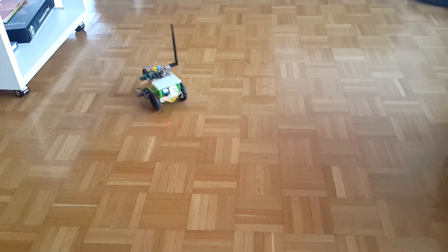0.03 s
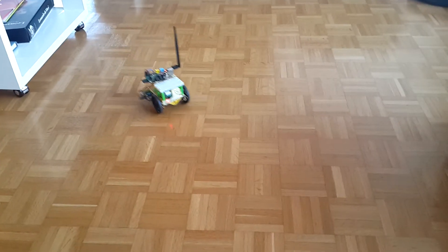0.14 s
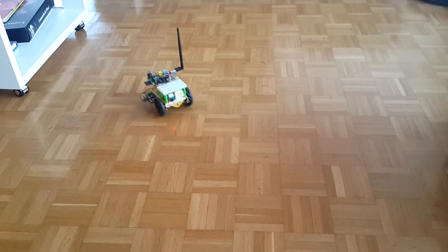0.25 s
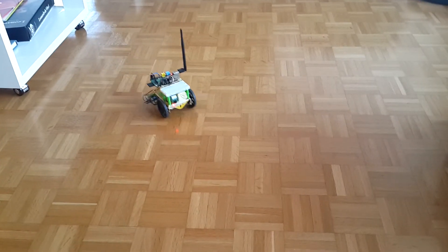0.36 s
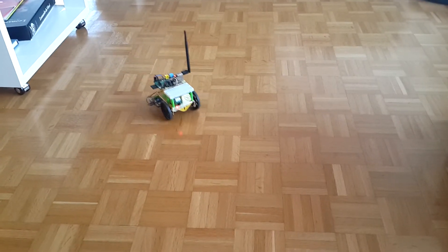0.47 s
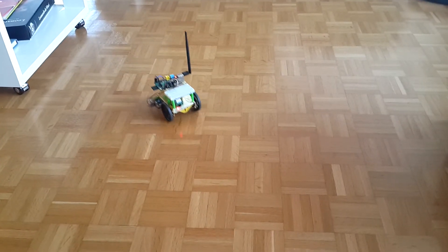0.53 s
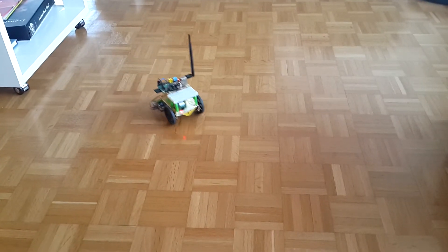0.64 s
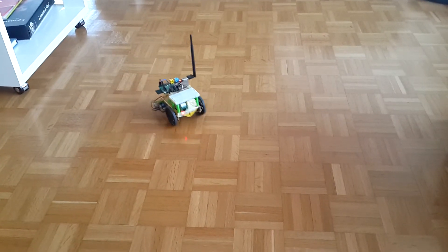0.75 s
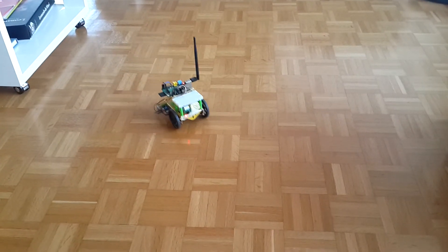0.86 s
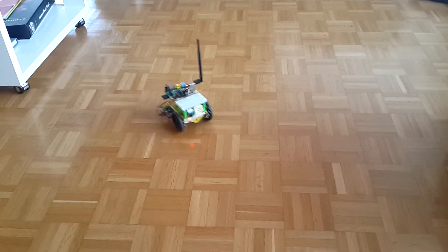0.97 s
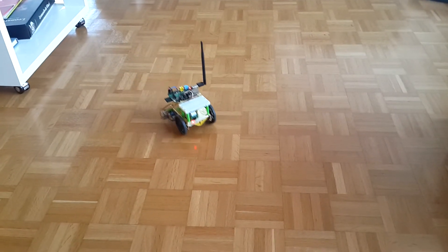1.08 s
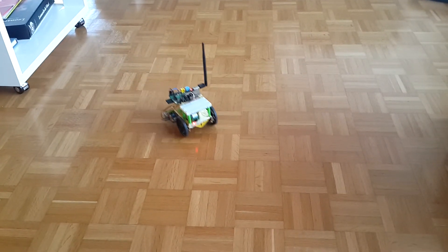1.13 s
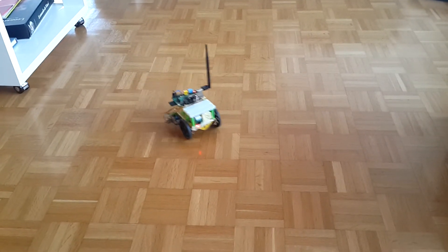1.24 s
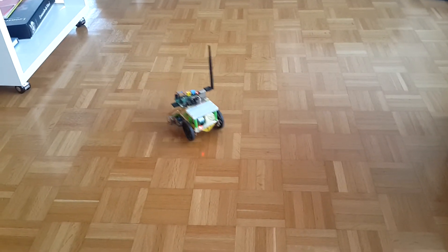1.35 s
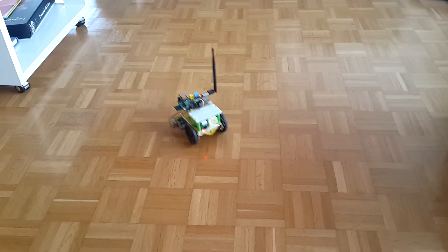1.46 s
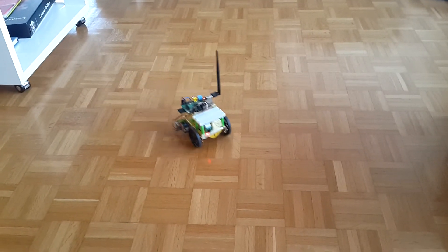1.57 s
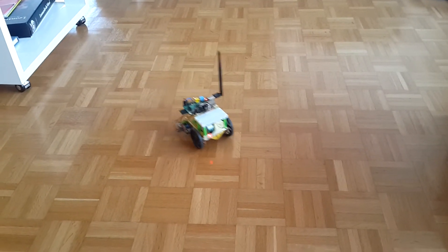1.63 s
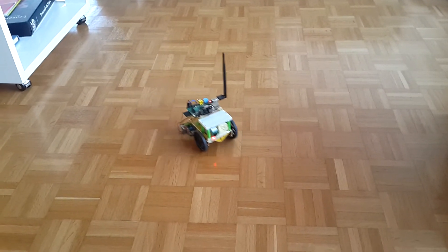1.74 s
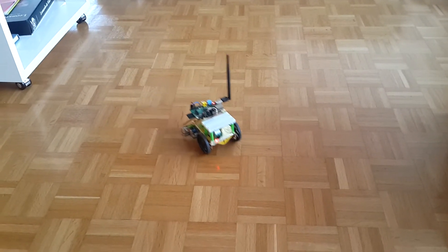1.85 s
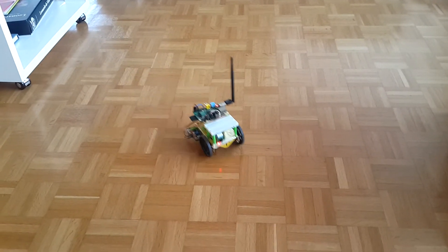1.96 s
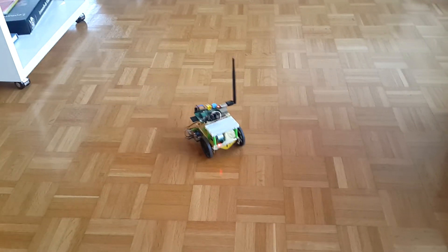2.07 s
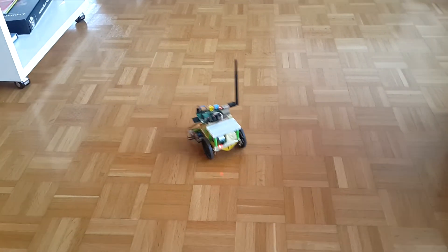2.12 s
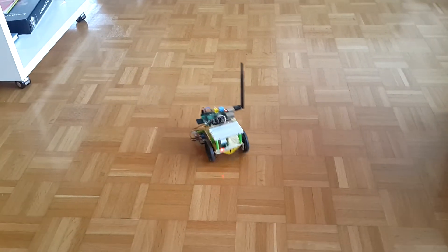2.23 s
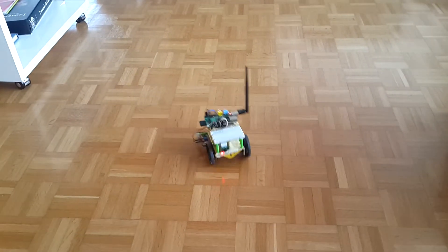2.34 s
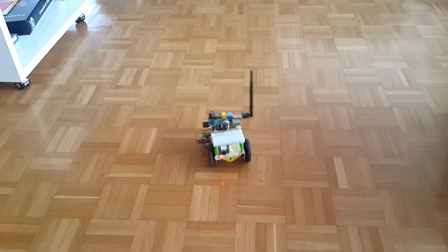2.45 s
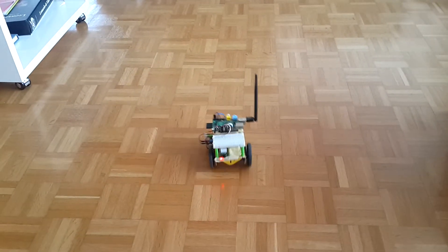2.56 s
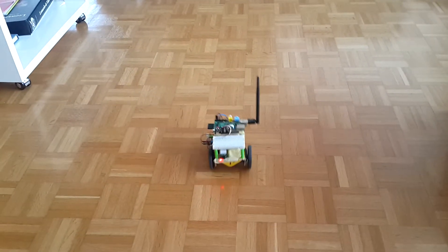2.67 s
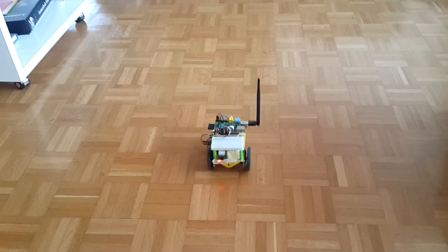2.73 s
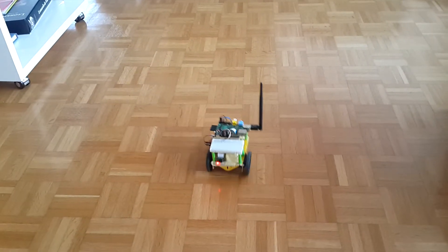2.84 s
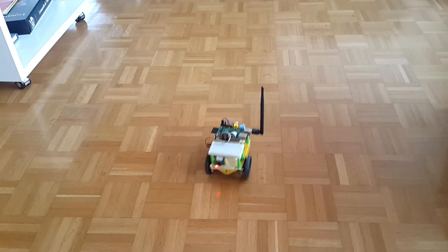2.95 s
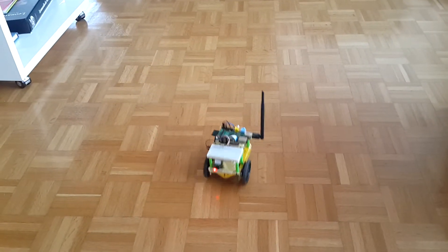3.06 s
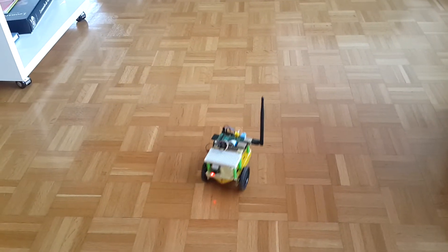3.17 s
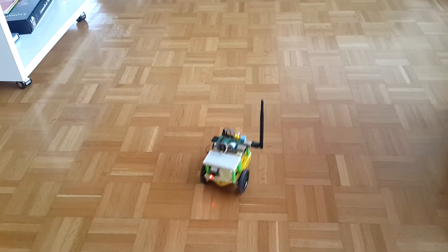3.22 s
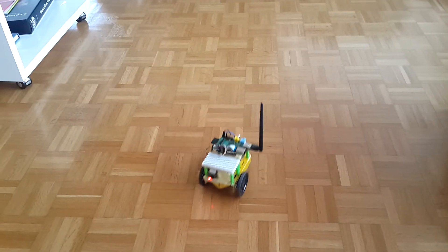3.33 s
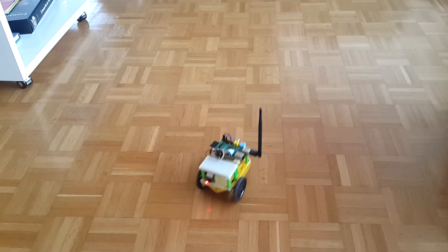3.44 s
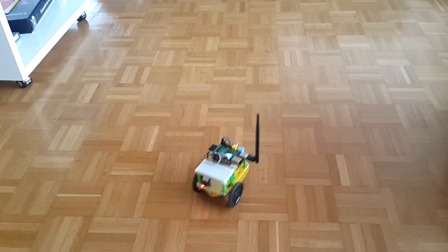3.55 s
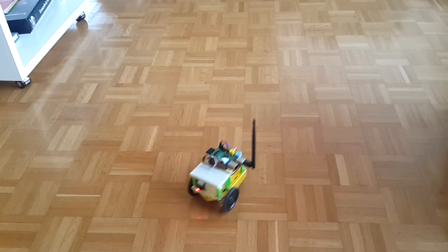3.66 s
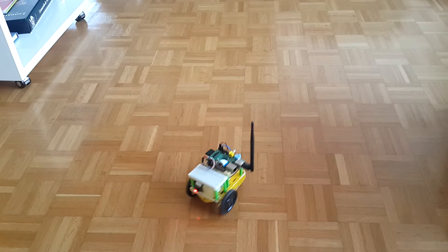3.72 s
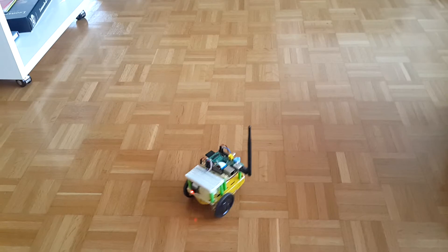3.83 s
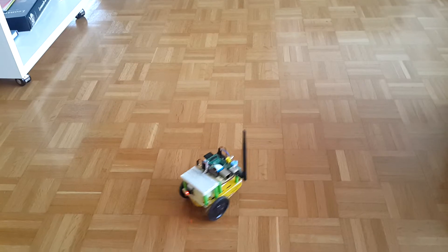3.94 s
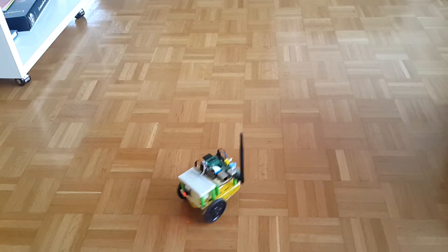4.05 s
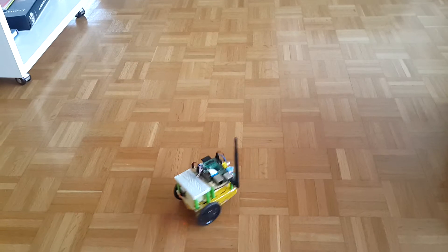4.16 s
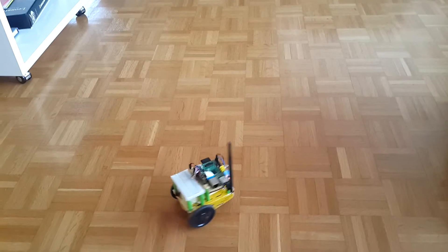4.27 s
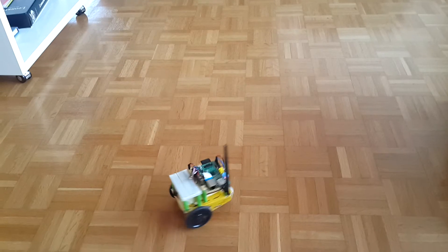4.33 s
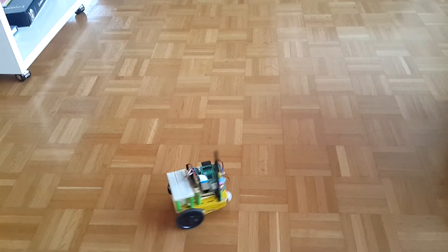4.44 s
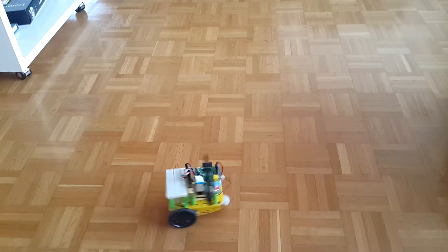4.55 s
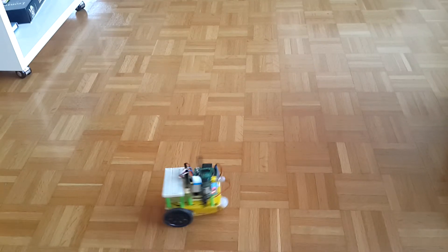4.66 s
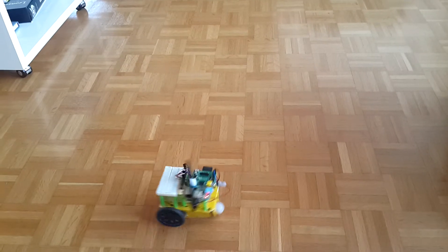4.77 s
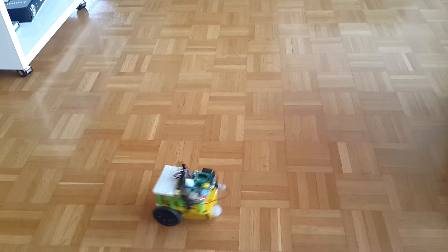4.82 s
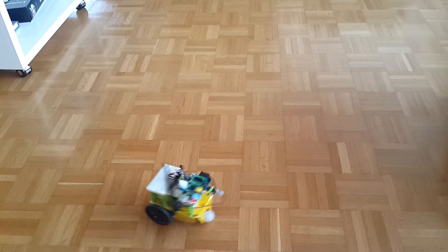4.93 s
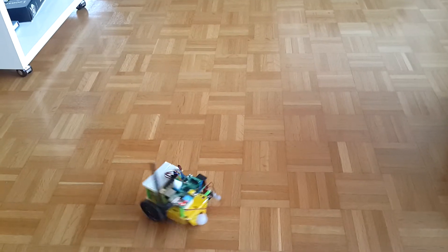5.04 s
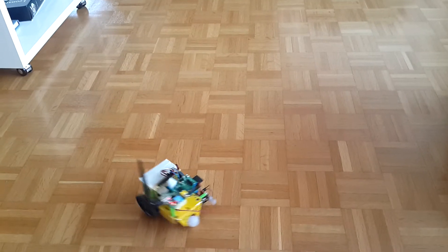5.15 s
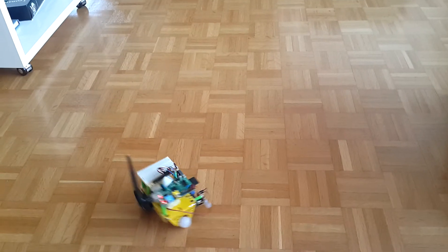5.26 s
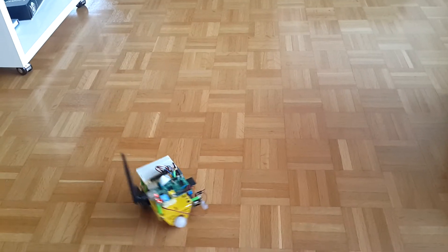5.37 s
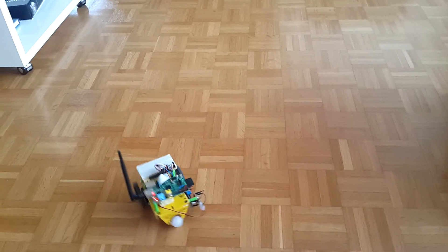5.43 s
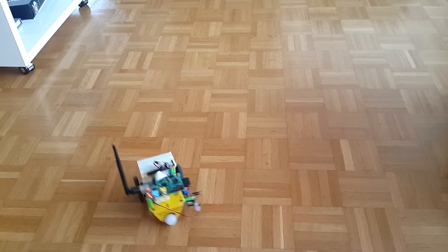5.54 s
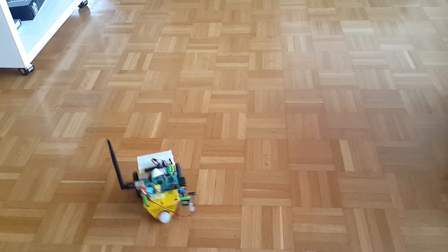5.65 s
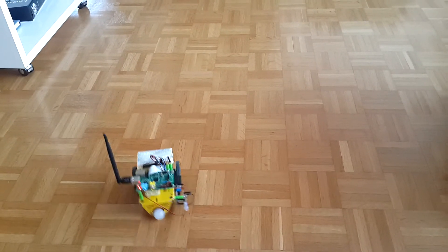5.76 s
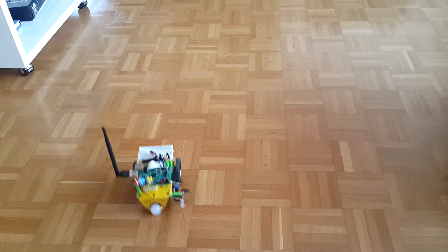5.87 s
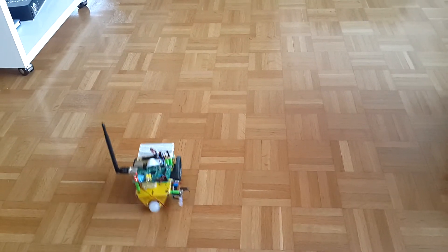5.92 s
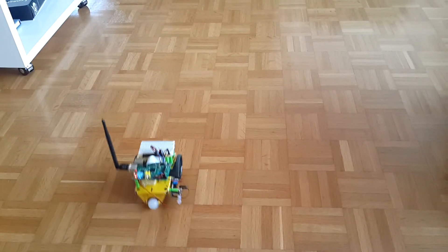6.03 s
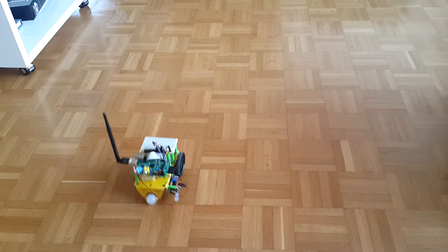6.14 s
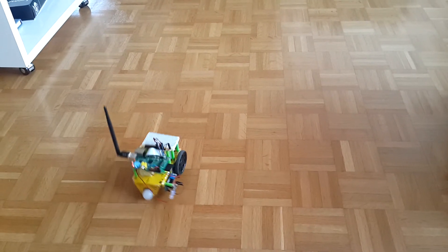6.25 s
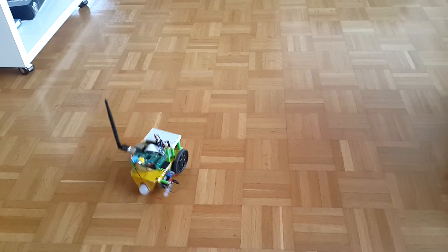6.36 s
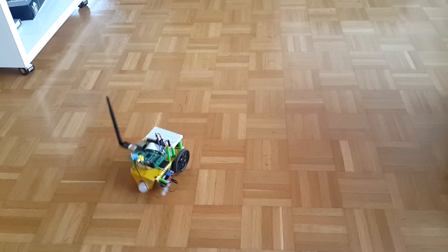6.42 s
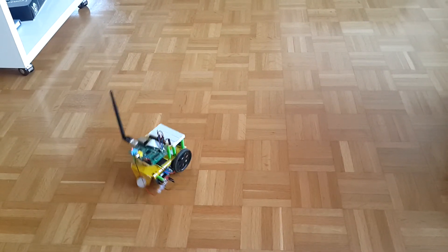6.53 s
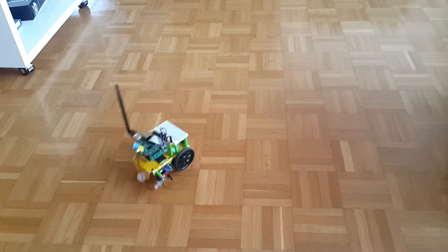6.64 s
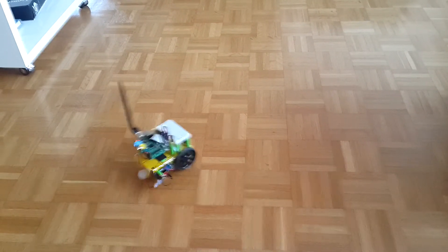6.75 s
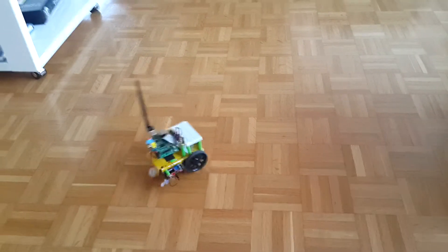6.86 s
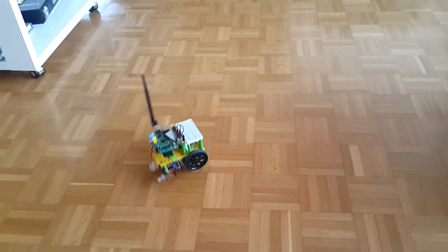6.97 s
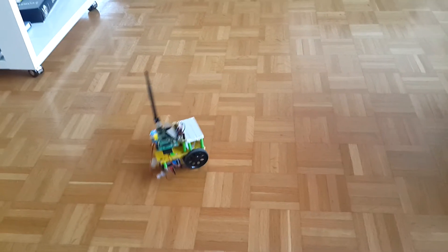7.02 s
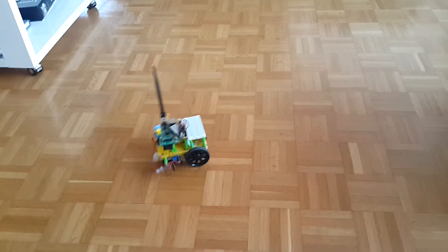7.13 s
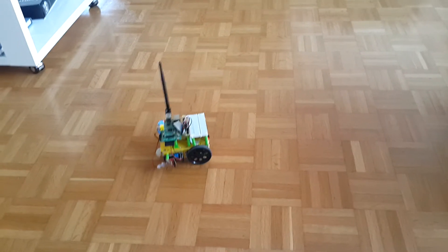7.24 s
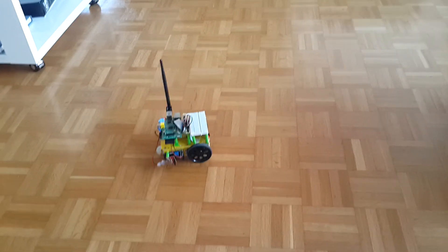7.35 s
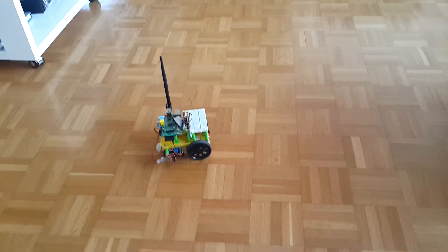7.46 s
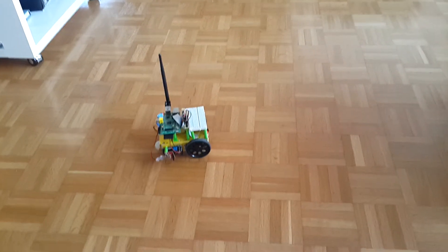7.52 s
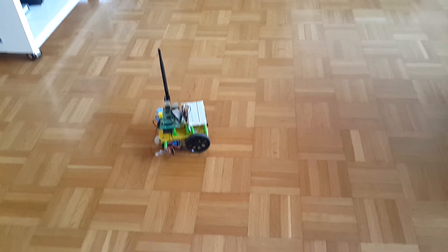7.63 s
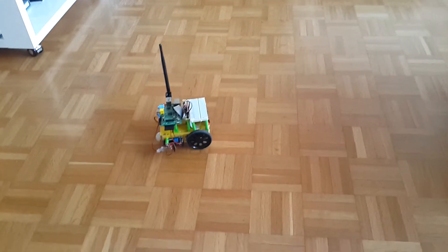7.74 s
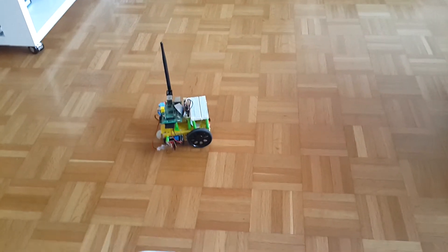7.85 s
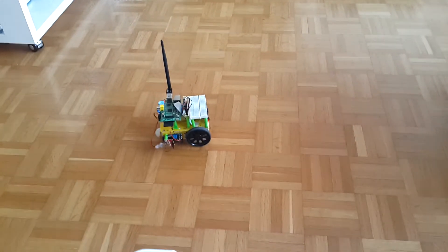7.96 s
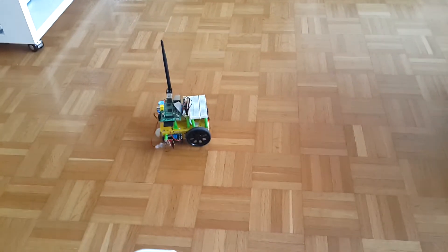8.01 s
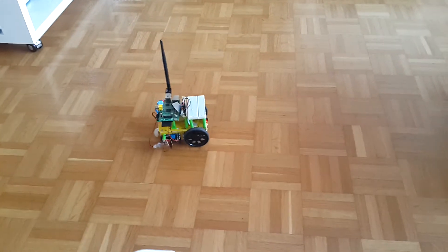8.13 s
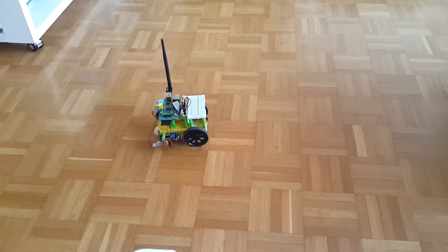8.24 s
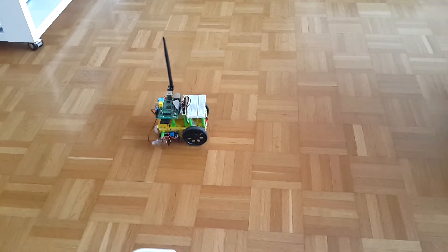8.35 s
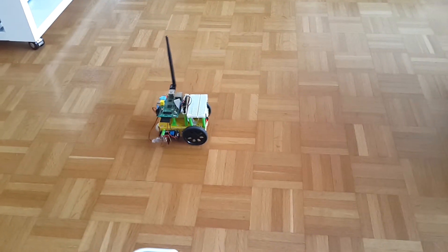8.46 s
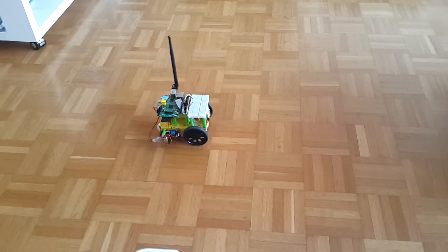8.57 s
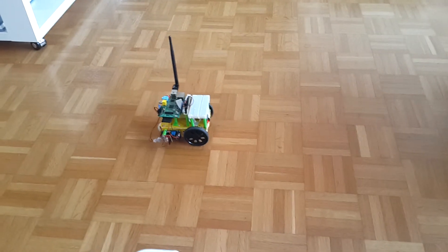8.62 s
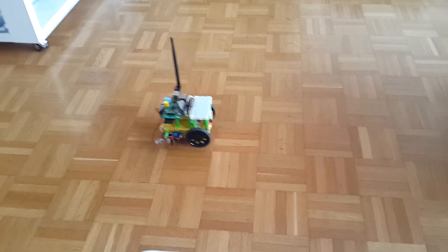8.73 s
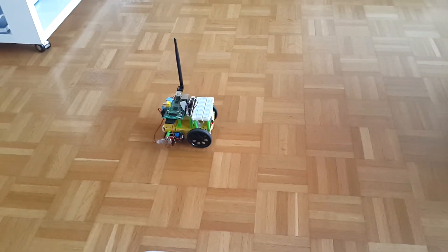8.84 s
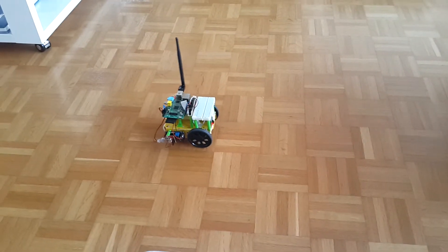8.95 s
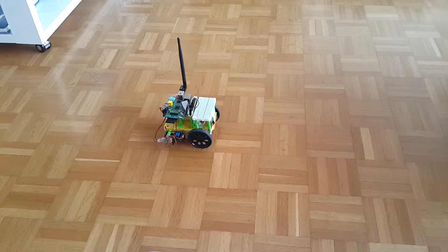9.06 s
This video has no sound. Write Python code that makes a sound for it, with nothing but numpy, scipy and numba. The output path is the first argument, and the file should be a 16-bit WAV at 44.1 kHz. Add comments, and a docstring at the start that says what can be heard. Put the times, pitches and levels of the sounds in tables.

```python
"""The whirring rattle of a small wheeled robot that drives and turns on a wooden floor, stops and twitches.
Gear teeth knock in bunches once a shaft turn and ring the shell; brushes sizzle, and shaft and pinion
sing on multiples of the turning rate. The robot draws near, coasts to rest, then strains three times.
Its electronics whistle faintly. Behind it: a low hum, a passing rumble, soft low bumps, one brief
mid-pitched ring and the hiss of a quiet furnished room."""
import sys
import numpy as np
from scipy import signal
from scipy.fft import rfft, irfft
from scipy.io import wavfile
from scipy.ndimage import uniform_filter1d
from numba import njit

SR = 44100
rng = np.random.default_rng(int(sys.argv[2]) if len(sys.argv) > 2 else 0)


def master_out(mix):
    """Clip the mix to full scale and print it as 16-bit PCM to the path in sys.argv[1]."""
    frames = np.transpose(np.atleast_2d(mix))
    ceiling = np.clip(frames, -1, 1)
    pcm = np.round(ceiling * 32767).astype(np.int16)
    wavfile.write(sys.argv[1], SR, pcm)


N = 400869
TIME_S = np.arange(N) / SR


def undb(db):
    """Decibels to gain."""
    return 10 ** (np.asarray(db) / 20)


def unit(x):
    """Scale to rms 1."""
    return x / np.sqrt(np.mean(x ** 2))


def curves(table, outside=None):
    """Columns of a time table, interpolated at every sample."""
    time_s, *columns = np.transpose(table)
    return [np.interp(TIME_S, time_s, column, outside, outside) for column in columns]


def gate(start_s, length_s, edge_s):
    """Ramp up, hold, ramp down."""
    return np.clip(np.minimum(TIME_S - start_s, start_s + length_s - TIME_S) / edge_s, 0, 1)


def walk(rate_hz):
    """Random steps, smoothed twice; spread near 1."""
    hold = int(SR / rate_hz)
    steps = np.repeat(rng.standard_normal(N // hold + 1), hold)
    return 1.35 * uniform_filter1d(uniform_filter1d(steps, hold), hold)[:N]


@njit
def bandpass(x, hz, width_hz):
    """State-variable band-pass, gain 1 at its moving centre."""
    y, band_state, low_state = np.empty(len(x)), 0., 0.
    for i in range(len(x)):
        g, damping = np.tan(np.pi * hz[i] / SR), width_hz / hz[i]
        band = (band_state + g * (x[i] - low_state)) / (1 + g * (g + damping))
        band_state, low_state = 2 * band - band_state, low_state + 2 * g * band
        y[i] = damping * band
    return y


def resonance(x, hz, width_hz):
    """Two band-passes in series, each width_hz wide; rms 1."""
    hz, width_hz = hz * np.ones(len(x)), float(width_hz)
    return unit(bandpass(bandpass(x, hz, width_hz), hz, width_hz))


def struck(teeth, hz, width_hz):
    """A resonance that takes each knock with its own random sign."""
    return resonance(teeth * rng.choice((-1., 1.), N)[:len(teeth)], hz, width_hz)


def body(teeth, modes):
    """Struck resonances in parallel, rms 1."""
    return unit(sum(undb(db) * struck(teeth, hz, 2 * half_width_hz) for hz, half_width_hz, db in modes))


def rattle(turns, knocks_per_s, scatter_db, throb, hiss_db):
    """Tooth knocks of scattered size over sliding hiss, bunched once a turn."""
    knocks = (rng.random(N) < knocks_per_s / SR) * undb(scatter_db * rng.standard_normal(N))
    angle = 2 * np.pi * turns
    bunching = 1 + throb * np.cos(angle) + 0.54 * throb * np.cos(3 * angle)
    return bunching * (unit(knocks) + undb(hiss_db) * rng.standard_normal(N))


# frequency_hz, relative_density_db
ROOM_SPECTRUM = [(15, -27), (25, -8), (156, -3.5), (282, -6.5), (784, -10.5), (1050, -11.5),
                 (1240, -13.5), (1760, -14), (7120, -16), (8840, -19.5), (9840, -15.5),
                 (10700, -20.5), (15600, -17)]

def room_tone(level_db=-71.5):
    """Steady air and microphone hiss over a slowly swelling bass."""
    hz, db = np.transpose(ROOM_SPECTRUM)
    bins_hz = np.maximum(np.fft.rfftfreq(N, 1 / SR), 1)
    colour = undb(np.interp(np.log(bins_hz), np.log(hz), db))
    hiss = unit(irfft(rfft(rng.standard_normal(N)) * colour, N))
    bass = undb(-17.5 + 3.4 * walk(5.1)) * resonance(rng.standard_normal(N), 76.7, 30)
    return undb(level_db) * (hiss + bass)


# time_s, low_band_db, upper_band_db
RUMBLE_LEVELS = [(0.0, -79, -76.5), (0.81, -79, -81.5), (1.39, -75, -78.5), (1.95, -78, -72),
                 (2.28, -84, -84), (2.74, -80, -84), (3.3, -82.5, -93), (4.2, -83, -91)]

def rumble():
    """A passing rumble: two noise bands that swell and fade."""
    low_db, upper_db = curves(RUMBLE_LEVELS, outside=-120)
    low = resonance(rng.standard_normal(N), 189, 140)
    upper = resonance(rng.standard_normal(N), 740, 560)
    return undb(low_db) * low + undb(upper_db) * upper


# start_s, length_s, fundamental_db, second_harmonic_db, third_harmonic_db
HUM_SWELLS = [(0.9, 0.25, -77.5, -92, -92), (1.25, 0.49, -74.5, -92, -82), (1.738, 0.534, -73, -89, -84.5),
              (2.3, 0.85, -80.5, -85.5, -92)]

def hum(pitch_hz=146):
    """A low tone with two overtones that comes in swells."""
    cycles = pitch_hz * np.cumsum(1 + 0.0034 * walk(4.9)) / SR
    harmonics = [undb(1.8 * walk(14)) * np.sin(2 * np.pi * k * cycles) for k in (1, 2, 3)]
    out = np.zeros(N)
    for start_s, length_s, *levels_db in HUM_SWELLS:
        tone = sum(undb(db) * harmonic for db, harmonic in zip(levels_db, harmonics))
        out += gate(start_s, length_s, edge_s=0.08) * tone
    return np.sqrt(2) * out


# start_s, gain_db, pitch_hz
BUMPS_AND_RING = [(0.1, -72, 220), (1.72, -63.5, 683), (3.62, -67, 173), (4.689, -66, 72.7),
                  (5.169, -70, 83.4), (6.498, -76, 150), (6.839, -69, 75.4), (7.597, -70.5, 164.5),
                  (8.549, -71, 86.1)]

def bumps_and_ring():
    """Soft low bumps, and one brief mid-pitched ring at 1.7 s."""
    out, t = np.zeros(N), np.arange(SR // 4) / SR
    envelope = t / 0.043 * np.exp(1 - t / 0.025)
    for start_s, gain_db, pitch_hz in BUMPS_AND_RING:
        tone = undb(gain_db) * envelope * np.sin(2 * np.pi * pitch_hz * t)
        i = int(start_s * SR)
        out[i:i + len(t)] += tone[:N - i]
    return out


# pitch_hz, level_db
WHINE_TONES = [(7345, -85), (14680, -95)]
# start_s, length_s, level_db
WHISTLE_EVENTS = [(7.53, .07, -87), (7.66, .14, -86), (7.85, .05, -86), (7.955, .065, -86), (8.42, .1, -89),
                  (8.62, .06, -89), (8.9, .19, -87)]

def electronics(whistle_hz=10180, sag_hz_per_s=1100):
    """A constant, wavering whine and short whistles that sag in pitch."""
    drifting_s = np.cumsum(1 + 0.0012 * walk(30)) / SR
    out = sum(undb(db + 0.91 * walk(20)) * np.sin(2 * np.pi * hz * drifting_s) for hz, db in WHINE_TONES)
    for start_s, length_s, level_db in WHISTLE_EVENTS:
        age_s = TIME_S - start_s
        cycles = whistle_hz * age_s - sag_hz_per_s * age_s ** 2 / 2
        out += undb(level_db) * gate(start_s, length_s, edge_s=0.004) * np.sin(2 * np.pi * cycles)
    return np.sqrt(2) * out


# centre_hz, half_width_hz, relative_db
TWITCH_MODES = [(3600, 1300, -4), (4620, 600, -3.5), (5300, 410, -2), (6360, 800, -7), (7440, 1100, -10),
                (10200, 2500, -14.5), (12800, 1500, -18)]
# start_s, length_s, level_db, jolt_db, swell_db, swell_peak_fraction,
# chassis_hz, chassis_relative_db, ring_relative_db, bracket_relative_db
TWITCH_EVENTS = [(8.032, 0.36, -69.5, 7, 1.5, 0.81, 2970, -13.5, -7, -24),
                 (8.4, 0.32, -67, 3, 5, 0.76, 2630, -7.5, -7.5, -12),
                 (8.893, 0.2, -71.5, 6, 6, 0.17, 2650, -2, -7, -5.5)]

def twitches(pulse_hz=100, jolt_s=0.008, release_db_per_s=650):
    """Sparse, uneven knocks as the resting motor strains against its pulsed supply."""
    teeth = rattle(pulse_hz * TIME_S, knocks_per_s=600, scatter_db=3.5, throb=0.2, hiss_db=-1)
    teeth *= undb(1.2 * walk(40))
    core = body(teeth, TWITCH_MODES)
    ring, bracket = struck(teeth, 5950, 260), struck(teeth, 8870, 600)
    out = np.zeros(N)
    for start_s, length_s, level_db, jolt_db, swell_db, peak_fraction, *colour in TWITCH_EVENTS:
        chassis_hz, chassis_db, ring_db, bracket_db = colour
        age_s = np.maximum(TIME_S - start_s, 0)
        envelope_db = level_db + jolt_db * np.exp(-age_s / jolt_s)
        envelope_db += np.interp(age_s, (0, peak_fraction * length_s, length_s), (0, swell_db, 0))
        envelope_db -= release_db_per_s * np.maximum(age_s - length_s, 0)
        chassis = struck(teeth, chassis_hz, 650)
        parts = core + undb(chassis_db) * chassis + undb(ring_db) * ring + undb(bracket_db) * bracket
        out += (TIME_S >= start_s) * undb(envelope_db) * parts
    return out


# cycles_per_turn
SHAFT_MULTIPLES = [1, 3, 5, 15, 18, 21, 54, 57, 60, 63, 69]
# far_db, near_db; one row per multiple
SHAFT_TONE_LEVELS = [(-85, -95), (-88, -96), (-89, -90), (-79, -79), (-76, -82), (-76, -90), (-85, -94),
                     (-80, -80), (-82, -90), (-81, -80), (-96, -81)]

def shaft_tones(turns, arrival_s=(1.96, 2)):
    """Tones on multiples of the shaft rate; their balance shifts as the robot arrives."""
    nearness = np.interp(TIME_S, arrival_s, (0, 1))
    out = np.zeros(N)
    for multiple, (far_db, near_db) in zip(SHAFT_MULTIPLES, SHAFT_TONE_LEVELS):
        level_db = far_db + nearness * (near_db - far_db) + 2.2 * walk(6)
        out += undb(level_db) * np.sin(2 * np.pi * (multiple * turns + 0.42 * walk(12)))
    return np.sqrt(2) * out


# time_s, tooth_rate_peak_db, octave_peak_db
PINION_LEVELS = [(0.0, -69.5, -79), (1.0, -77.5, -78), (1.9, -75, -71), (2.2, -71, -64), (3.6, -68, -61.5),
                 (3.95, -65.5, -60), (4.4, -65, -59.5), (4.6, -78, -62), (4.74, -62, -64), (5.05, -77, -72),
                 (5.93, -78, -61.5), (6.55, -80, -69), (6.66, -63, -69), (7.28, -70, -59)]

def pinion(turns, tooth_count=10):
    """The pinion whines at its tooth rate and the octave above."""
    return sum(undb(db) * np.sin(2 * np.pi * (k * tooth_count * turns + 0.18 * walk(12)))
               for k, db in zip((1, 2), curves(PINION_LEVELS)))


# start_s, length_s, start_hz, end_hz, width_hz, level_db
SIZZLE_BANDS = [(2.75, 1.6, 15350, 15350, 350, -73), (3.3, 1.3, 14700, 14700, 800, -72),
                (3.6, 1.0, 12000, 12000, 900, -69), (4.601, 0.96, 3400, 3400, 250, -66),
                (4.701, 0.62, 11770, 11800, 1000, -58), (4.9, 0.5, 3950, 4000, 350, -63.5),
                (5.6, 0.75, 15350, 15350, 350, -77), (5.719, 0.95, 10900, 11500, 1000, -59.5),
                (6.751, 0.6, 9600, 10100, 900, -59)]

def sizzle(teeth):
    """Narrow bands of the rattle that fade in and out; some glide a little."""
    out = np.zeros(N)
    for start_s, length_s, start_hz, end_hz, width_hz, level_db in SIZZLE_BANDS:
        i, j = int(start_s * SR), int((start_s + length_s) * SR)
        band = struck(teeth[i:j], np.linspace(start_hz, end_hz, j - i), width_hz)
        out[i:j] += undb(level_db) * gate(start_s, length_s, edge_s=0.1)[i:j] * band
    return out


# centre_hz, half_width_hz, relative_db
CHASSIS_MODES = [(1110, 106, -12.5), (1388, 150, -8), (1603, 290, -6), (1924, 123, 2), (2032, 55, -7),
                 (2480, 313, 6.5), (2800, 470, 1.5)]
GEARBOX_MODES = [(3355, 440, -0.5), (3755, 260, -6.5), (4486, 860, 9.5)]
BRUSH_MODES = [(12700, 600, -2), (13600, 1800, 0), (14150, 350, -5), (14800, 1000, -1)]
# Heard from all sides: time_s, chassis_db, gearbox_db, brush_db
BODY_LEVELS = [(0.0, -68, -62, -69), (0.75, -65, -60, -68), (1.0, -66.5, -62, -70), (1.55, -66, -60.5, -71),
               (2.13, -60.5, -56.5, -71), (3.0, -60, -56, -69), (3.9, -60, -55, -71),
               (4.3, -58.5, -53.5, -68), (4.7, -60.5, -56, -69.5), (5.3, -60.5, -55.5, -68),
               (5.9, -61, -56, -70), (6.6, -61, -57.5, -69), (7.27, -59.5, -54, -70)]
# Faces that swing past in turns: time_s, main_hz, upper_hz, main_db, upper_db, bracket_db, top_db
SHELL_FACES = [(0.0, 5970, 7300, -58, -57.5, -66, -68), (0.75, 5980, 7450, -51.5, -54, -65, -68.5),
               (1.0, 6000, 7470, -56, -56.5, -67.5, -69.5), (1.6, 5950, 7490, -52.5, -55, -68, -70.5),
               (2.13, 5730, 7750, -45.5, -49, -58.5, -62.5), (3.01, 5660, 6900, -45.5, -49, -59, -60.5),
               (3.8, 5640, 7200, -47.5, -53, -56, -58.5), (4.1, 5600, 7750, -46, -51.5, -51.5, -60),
               (4.68, 5580, 7730, -46, -48, -61, -59.5), (4.87, 5580, 7460, -50.5, -46, -56, -58.5),
               (5.1, 5560, 7240, -50, -48.5, -52.5, -56.5), (5.58, 5750, 7700, -48, -47, -64, -60),
               (5.7, 5740, 7470, -44.5, -47.5, -59.5, -62), (5.95, 5800, 6850, -44, -48.5, -57, -60),
               (6.31, 5880, 6920, -45.5, -48, -51, -60), (6.5, 5820, 6900, -46.5, -48.5, -57.5, -62),
               (6.71, 5970, 7500, -50.5, -52, -57.5, -61), (7.0, 5840, 7860, -46.5, -48.5, -56, -60),
               (7.27, 5960, 7480, -45.5, -46.5, -57.5, -61)]
# time_s, centre_hz
TOP_RESONANCE = [(1.2, 10000), (2.0, 10500), (4.3, 10660), (6.5, 10440), (7.0, 9900)]
# Run-down with one slack moment in the gears: time_s, relative_db
RUN_DOWN_LEVELS = [(7.275, 0), (7.322, -13), (7.346, -6), (7.464, -12), (7.54, -26.5), (7.632, -37),
                   (7.7, -38)]

def shell(teeth, stop_s):
    """Tooth knocks ring each part of the robot; unloaded gears sound darker as they run down."""
    main_hz, upper_hz, main_db, upper_db, bracket_db, top_db = curves(SHELL_FACES)
    chassis_db, gearbox_db, brush_db = curves(BODY_LEVELS)
    slack = np.interp(TIME_S, (stop_s, stop_s + 0.059), (0, 1))
    treble_db = -2.5 * slack
    parts = [(main_db - 1.5, resonance(struck(teeth, main_hz, 1500), main_hz, 1500)),
             (main_db - 7, struck(teeth, 5357, 440)),
             (upper_db + treble_db - 8.5, struck(teeth, 8070, 350)),
             (main_db - 11, struck(teeth, 6420, 400)),
             (top_db + treble_db - 3.5, struck(teeth, 11500, 3700)),
             (chassis_db + 2.5 * slack, body(teeth, CHASSIS_MODES)),
             (gearbox_db + 6.5 * slack, body(teeth, GEARBOX_MODES)),
             (upper_db + treble_db, struck(teeth, upper_hz, 2220)),
             (bracket_db + treble_db, struck(teeth, 9070, 1000)),
             (top_db + treble_db, struck(teeth, curves(TOP_RESONANCE)[0], 1700)),
             (brush_db + treble_db, body(teeth, BRUSH_MODES))]
    # each part catches a varying share of the knocks
    ringing = sum(undb(db + 0.65 * walk(5)) * part for db, part in parts)
    scrape_db = 3.4 * np.exp(-((TIME_S - 1.3) / 0.028) ** 2)
    running = TIME_S < RUN_DOWN_LEVELS[-1][0]
    return running * undb(curves(RUN_DOWN_LEVELS)[0] + scrape_db) * ringing


# time_s, driven_turns_per_s
SHAFT_SPEED = [(0, 225.3), (0.4, 224.9), (0.7, 223.2), (1.05, 225.2), (1.85, 225.3), (2.2, 223.5),
               (2.45, 224.7), (2.8, 224.7), (3.15, 222.8), (3.5, 224.5), (4.0, 225.0), (4.25, 223.1),
               (5.0, 224.1), (5.65, 222.5), (5.85, 224.0), (6.15, 224.1), (6.45, 223.2), (7.3, 223.4)]

def drive(stop_s=7.3, coast_s=0.15):
    """The motor shaft paces the gear rattle and the tones, then coasts to rest."""
    speed_fraction = np.exp(-np.maximum(TIME_S - stop_s, 0) / coast_s)
    turns = np.cumsum(curves(SHAFT_SPEED)[0] * speed_fraction * (1 + 0.00077 * walk(40))) / SR
    teeth = rattle(turns, knocks_per_s=4000, scatter_db=4.14, throb=0.12, hiss_db=0.94)
    teeth *= undb(0.42 * walk(25.03) + 0.33 * walk(6.9))
    gears = shell(teeth, stop_s) + sizzle(teeth)
    return gears + speed_fraction ** 4 * (shaft_tones(turns) + pinion(turns))


def echoes(direct, t60_s=0.35, renew_s=0.25, wet_db=-7):
    """Diffuse tail off walls and floor, redrawn as the robot moves so that no room peak lasts."""
    hop, t = int(renew_s * SR), np.arange(SR // 2) / SR
    decay = np.exp(-np.log(1000) * t / t60_s) * (t > 0.004)
    window = np.sin(np.pi * np.arange(2 * hop) / (2 * hop))
    padded = np.pad(direct, (hop, 2 * hop))
    out = np.zeros(N + 4 * hop + len(t))
    for i in range(0, N + hop, hop):
        tail = signal.fftconvolve(padded[i:i + 2 * hop] * window, decay * rng.standard_normal(len(t)))
        out[i:i + len(tail)] += tail
    return undb(wet_db) * out[hop:hop + N] / np.sqrt(np.sum(decay ** 2))


def scene():
    """The robot, its echoes and the background, alike on both channels."""
    robot = drive() + twitches()
    mix = robot + echoes(robot) + electronics() + hum() + rumble() + bumps_and_ring() + room_tone()
    return np.tile(mix, (2, 1))


def record(dry):
    """Steep low-pass at 15520 Hz."""
    return signal.sosfilt(signal.ellip(12, 0.2, 70, 15520, fs=SR, output="sos"), dry)


dry = scene()
out = record(dry)
master_out(out)
```